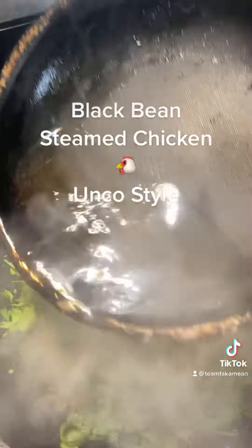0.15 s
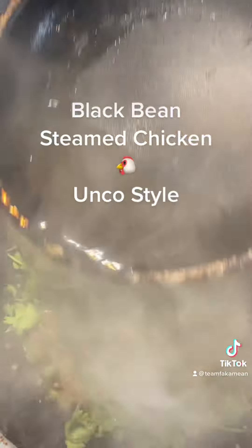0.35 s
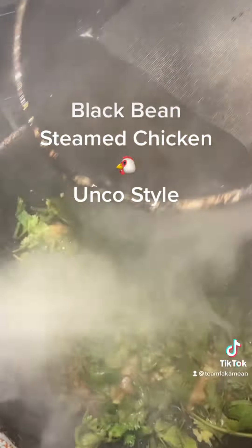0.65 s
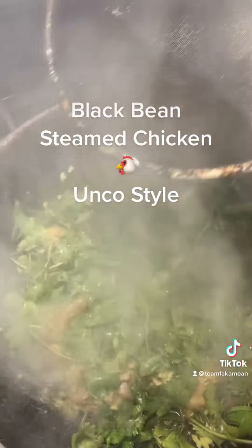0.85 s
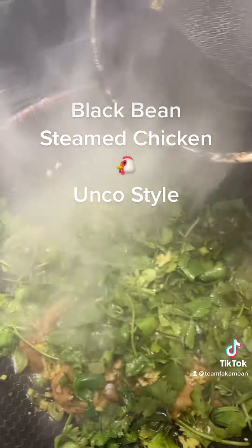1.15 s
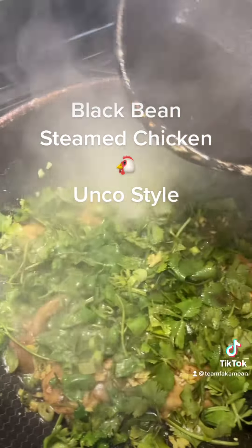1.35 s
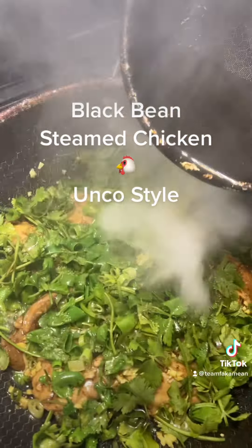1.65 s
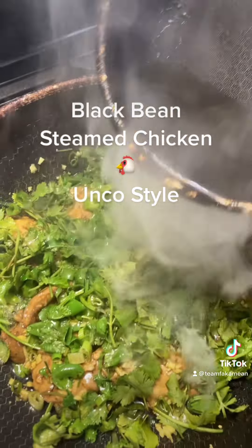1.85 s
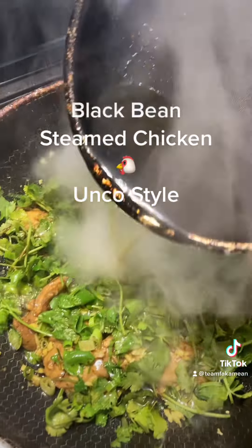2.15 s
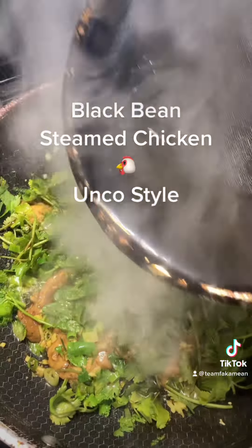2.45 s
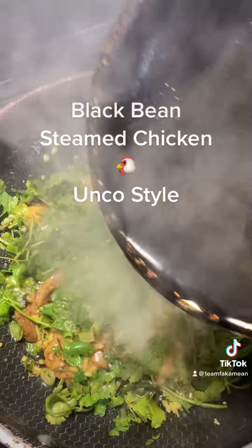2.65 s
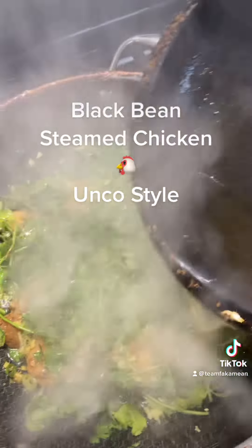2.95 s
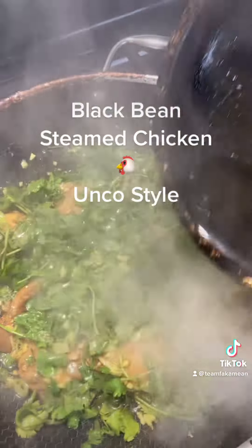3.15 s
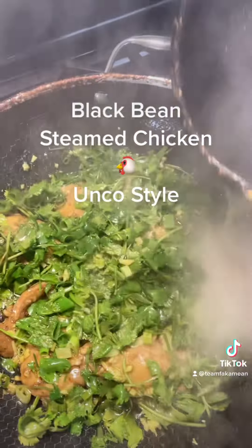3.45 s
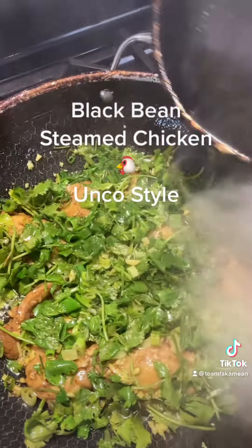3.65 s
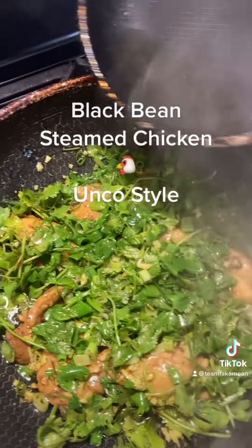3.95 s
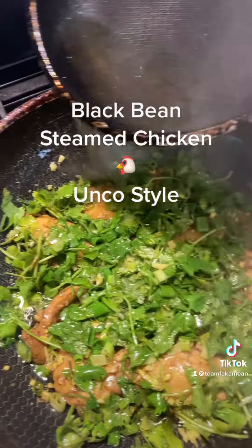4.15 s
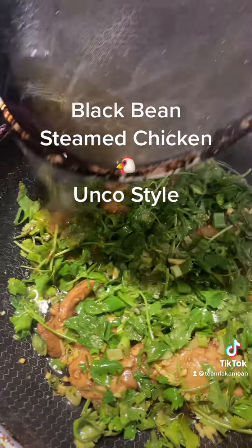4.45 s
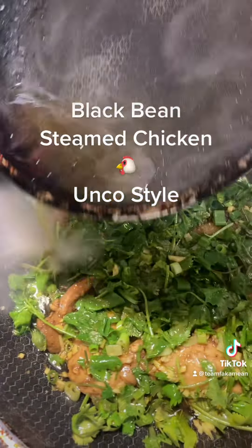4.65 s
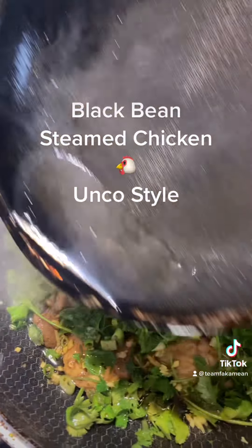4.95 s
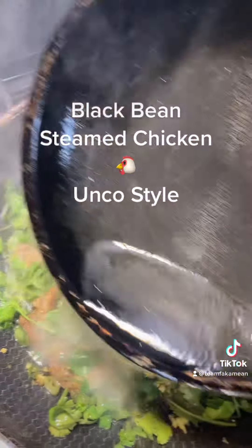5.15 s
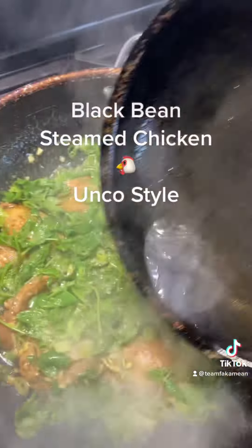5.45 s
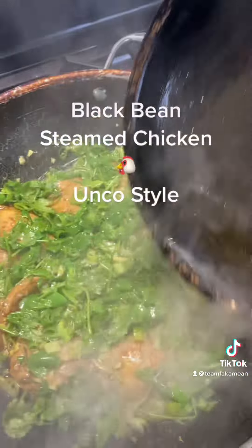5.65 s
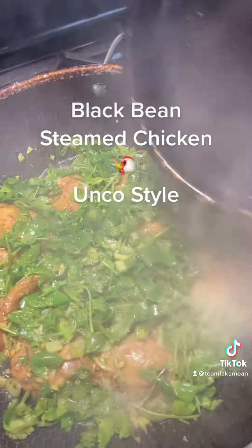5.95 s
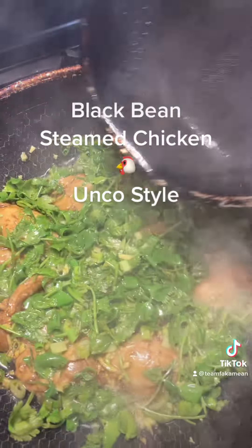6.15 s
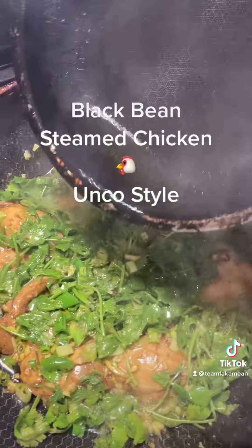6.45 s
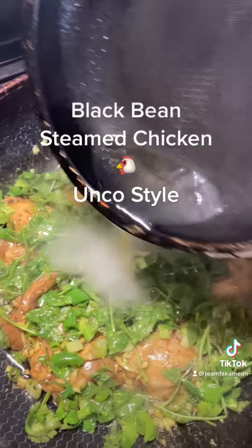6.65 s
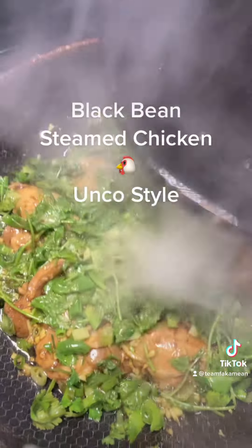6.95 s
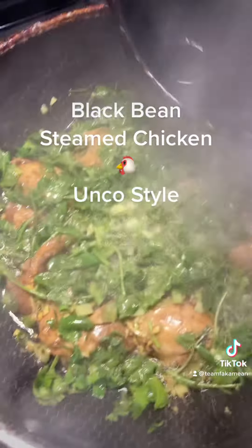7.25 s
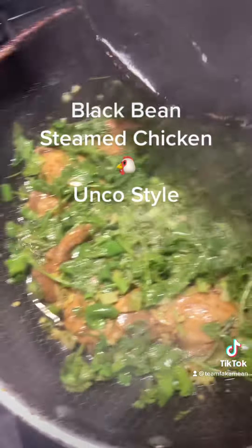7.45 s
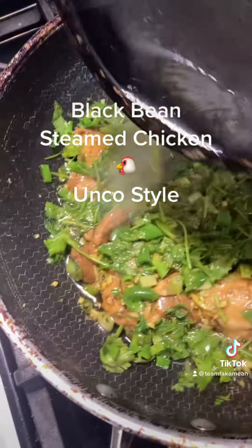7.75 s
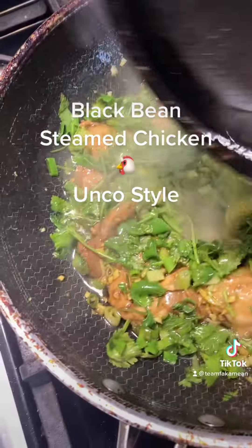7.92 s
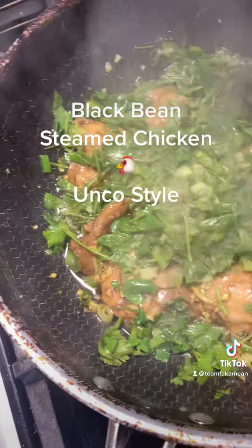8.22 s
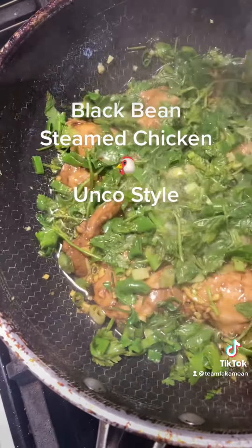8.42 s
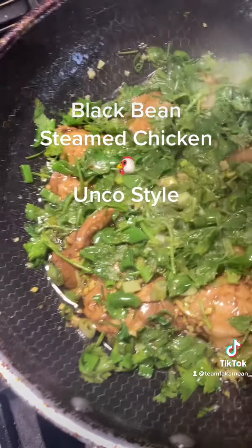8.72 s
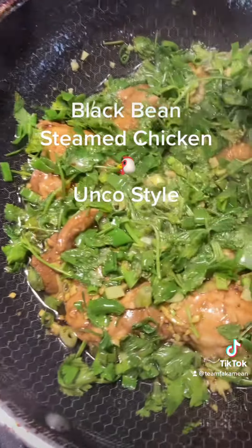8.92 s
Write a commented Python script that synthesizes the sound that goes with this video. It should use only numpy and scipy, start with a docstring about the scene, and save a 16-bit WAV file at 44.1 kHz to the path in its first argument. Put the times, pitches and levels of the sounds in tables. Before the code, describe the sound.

Hot oil sizzles loudly in repeated spurts over wet herbs in a pan, with small pops, over a low fan drone and steam rumble.

```python
"""Hot oil sizzles as it is poured in spurts over wet herbs in a wide pan, close to a phone's one microphone.
Each spurt boils up and dies away: thousands of tiny bubbles burst each second and ring the pan's hollow.
A few fat bubbles pop alone, and some splashes land with a sharp hiss. Underneath, a hood fan drones
and steam rumbles past the microphone, thicker as the oil boils harder."""
import sys
import numpy as np
from scipy import signal
from scipy.fft import rfft, irfft, next_fast_len
from scipy.io import wavfile
from scipy.ndimage import uniform_filter1d

SR = 44100
rng = np.random.default_rng(int(sys.argv[2]) if len(sys.argv) > 2 else 0)


def transcribe(signal):
    """Save signal, clipped to [-1, 1], as a 16-bit WAV file at the path in sys.argv[1]."""
    frames = np.atleast_2d(signal).T
    limited = np.clip(frames, -1, 1)
    pcm = np.round(limited * 32767).astype(np.int16)
    wavfile.write(sys.argv[1], SR, pcm)


N = 400516

# spurts of oil, each on its own patch of herbs: (start [s], rise [s], initial fade [dB/s],
# mid bubbles [dB], small bubbles [dB re mid], spray [dB re mid], large bubbles [dB re mid],
# mid tilt [dB/octave], small tilt [dB/octave], steam whistle pitch [Hz], whistle boost [dB])
SPURTS = [(-0.032, 0.22, 43, -20.5, 0.0, -1, -7, -8, -7.0, 5500, 3.0),
          (0.431, 0.05, 44.5, -14.5, 0.5, -5.0, -13, 1, -2.0, 5000.0, 1.0),
          (0.55, 0.035, 58, -26, -4, -8.5, -8, -6, -1, 4500, 2),
          (0.888, 0.06, 39.5, -21.0, 6.5, 2.5, -6.5, -5, -2.5, 5500.0, 0.5),
          (1.102, 0.015, 135.0, -25.5, -7.0, -4.0, -3, -1, -7.0, 4700.0, 2.0),
          (1.206, 0.141, 19, -20.5, 1.5, 0, -7.0, 5.0, -4.0, 5360, 7),
          (1.523, 0.078, 21, -27.0, 8.5, 0.5, -9.5, -1, 6, 4340, 4.5),
          (1.883, 0.25, 18.5, -24.5, 3.5, -3.5, -10, -6.5, -1, 4800.0, 5),
          (2.02, 0.044, 44, -32, 5, -2, -5, -3, 10, 5330, 4),
          (2.52, 0.26, 11, -27.5, 0.5, 1, -5.5, 5, 6.0, 3800.0, 3),
          (2.841, 0.27, 22, -23.5, 1.5, -4, -17, -10.0, -3, 4150, 4.0),
          (3.296, 0.14, 30.0, -26.5, 2, -0.5, -10.5, -4.0, -4, 4750.0, 1.0),
          (3.939, 0.09, 144, -32.5, -2, -6, -9.5, 9, 7, 5200.0, 3),
          (4.083, 0.047, 34, -27, 1.5, -0.5, -5.5, 2, 6, 5150.0, 1),
          (4.19, 0.4, 30, -24.5, -3, -1.5, -12, 2, -10, 4600.0, 4.5),
          (4.518, 0.18, 47, -17, -2, -6, -14.5, -10, 0, 4550.0, 6),
          (5.076, 0.022, 44, -23.5, -1.5, -2.5, -12.5, -9, -12, 5550.0, 11.0),
          (5.14, 0.21, 31, -22.5, 3, 0, -11, -8.0, 2, 4050, 7),
          (5.68, 0.14, 43, -22, 2, -2.5, -13, -3, -3.5, 4070, 2.5),
          (6.325, 0.065, 33, -30, 2.5, -0.5, -8, 6, 6.0, 4300.0, 2),
          (6.482, 0.18, 10, -26.5, 0.5, -4, -8, -2.5, 1.0, 4770, 6),
          (6.894, 0.12, 77, -23.0, -1, -1, -6.5, 7, 8, 3760, 6.5),
          (6.99, 0.17, 65, -33.5, 8.5, 4.5, 0, 3.0, 3, 5150.0, 7),
          (7.603, 0.11, 28, -28.0, 4.5, 0.5, -6, -1, 7, 5000, 5),
          (7.904, 0.15, 35, -23.0, 1.5, -1, -10, 0, -1, 5450.0, 6),
          (8.32, 0.14, 131, -43, 12, 1, -1, -5.5, 15, 5000, 3.5),
          (8.607, 0.026, 54, -35.5, 5, 0.5, -4, 15, 1, 4850.0, 4),
          (8.64, 0.15, 147, -37, 6.5, 1.5, -1.5, 1, 6.0, 4800.0, 2),
          (8.705, 0.012, 90, -42, 14, 4, 2, 0, 3, 4870, 8),
          (8.9, 0.024, 104, -49, 12.5, 6, -6, -4, 5, 5200, 3)]
# edges of the four sizzle bands, large, mid and small bubbles, then spray: (frequency [Hz])
BAND_EDGES_HZ = [450, 2000, 3400, 5900, 17000]
# what boils on between spurts, per band: (level [dB])
SIMMER_DB = [-47, -48.5, -45.5, -46.5]
# lone spits, per band: (level [dB re the dense fizz])
CRACKLE_DB = [-6.5, -6, -7, -7.5]
# how far each pitch slice swells and fades, per band: (spread [dB])
DRIFT_DB = [1.4, 2.4, 1.06, 1.9]
# EQ that pan and microphone give a burst: (frequency [Hz], gain [dB])
PAN_EQ = [(280, -59.5), (480, -33.5), (597, -13), (873, -17), (1070, -11.5), (1350, -15.5), (1920, -12),
          (2420, 4.5), (3390, -1), (4540, -0.5), (5410, 2), (6080, -9), (8140, -12.5), (12800, -12),
          (15700, -17)]
# narrow resonances of the pan's hollow: (frequency [Hz], width [Hz], boost [dB])
PAN_RESONANCES = [(2330, 200, 3), (2990, 69, 1.5), (4440, 420, 5.5), (5450, 220, 1)]
# early reflections off pan wall, lifted pan and hood: (delay [s], gain [dB])
REFLECTIONS = [(.0028, -23.5), (.0061, -18), (.011, -16)]
# slow EQ sweep as the lifted pan moves over the food; a negative dip is a boost: (time [s],
# large-bubble tilt [dB/octave], low dip [Hz], its depth [dB], upper dip depth [dB], spray tilt [dB/octave])
PAN_SWEEP = [(0.3, -2, 801, 8.5, -4.5, 1), (1.0, 1.5, 860, -7, -1.5, 0), (1.65, -1, 910, -3.5, 9, 1.5),
             (2.2, -2.5, 910, 2.5, 0, 1.5), (2.802, 0.5, 860, 5.5, 4.5, -2.5), (3.5, 0, 860, 3, -1, 2),
             (4.2, 2.5, 806, -5, 2.5, 0.5), (4.8, 0, 990, 4, -5, 1), (5.35, 2, 790, 1.5, 3, -3.5),
             (5.9, 1, 860, 0, -2, 1.5), (6.5, -4, 890, 0, 5, -0.5), (7.0, -1.5, 970, 11.5, 9, 0),
             (7.7, -1, 900, 4, 9, 1), (8.1, -1, 905, 6, -2, 1.5), (8.7, 0.5, 805, -1, 4.5, -4)]
# air noise of the hood fan: (frequency [Hz], gain [dB])
FAN_EQ = [(35, -30), (60, -5), (399, -5.5), (548, -11.5), (821, -13), (1900, -11), (2470, -39),
          (4180, -120)]
# hum of the fan: (pitch [Hz], level [dB])
FAN_TONES = [(124, -68.5), (415, -65.5)]
# steam rumble: (frequency [Hz], gain [dB])
STEAM_EQ = [(15, -43), (25, -17), (118, -2.5), (152, -4.5), (206, -0.5), (476, -5), (520, -0.5),
            (680, -7.5), (1140, -120)]
# thick clouds of steam that hit the microphone: (time [s], half-width [s], boost [dB])
STEAM_CLOUDS = [(.18, 0.23, 8), (.58, 0.17, 4.5), (4.65, 0.18, 0.5), (8.88, 0.09, 4)]
# slow fader ride on fan and steam together: (time [s], gain [dB])
BED_RIDE = [(0, -0.5), (2.8, 2), (3.9, -3), (4.8, 1), (6.1, 0), (7.2, 1.5), (9.08, 0.5)]
# fat bubbles that pop alone: (time [s], level [dB], pitch [Hz])
POPS = [(0.255, -2, 2430), (0.5394, -9, 2490), (1.724, 7, 4600), (2.4289, -12, 2540), (3.1692, -15, 4580),
        (3.916, -14, 2430), (4.436, -4, 2440), (4.4473, 1, 4100), (5.232, 4, 4460), (5.4745, -4, 2330),
        (5.4999, -1, 5100), (5.7009, -16, 4000), (6.205, -7.5, 2640), (6.2608, -12, 2630),
        (6.548, -7, 2510), (7.2659, -7, 5370), (7.3355, -14, 5130), (7.368, -9, 5590), (8.2881, -15, 2760),
        (8.4287, -6, 4900), (8.556, -4.5, 4600), (8.7154, -3, 5010), (8.7184, -7, 4600), (8.78, -7, 4700),
        (8.9743, -9.5, 4360), (9.0727, -18.5, 4470)]
# first hiss as a splash of oil lands: (time [s], level [dB])
SPLASHES = [(0.4484, -9), (0.9054, -4), (4.0916, -21), (5.0914, 2), (5.7228, -13), (6.345, -4),
            (7.6206, -19), (8.6268, -10)]


def undb(db):
    """Decibels to amplitude."""
    return 10 ** (np.asarray(db) / 20)


def level(x, db):
    """Set the rms level."""
    return x * undb(db) / np.sqrt(np.mean(x ** 2))


def decay(age, t60):
    """Envelope that falls 60 dB in t60 seconds."""
    return np.exp(-np.log(1000) * age / t60)


def bell(hz, centre_hz, width_hz):
    """EQ bell: 1 at the centre, 1/2 at the edges of the width."""
    return 1 / (1 + (2 * (hz - centre_hz) / width_hz) ** 2)


def walk(rate):
    """Random levels held 1 / rate s and slewed twice; spread near 1."""
    hold = int(SR / rate)
    steps = np.repeat(rng.standard_normal(N // hold + 1), hold)
    return 1.2 * uniform_filter1d(uniform_filter1d(steps, hold), hold)[:N]


def eq(x, points, peaks=(), size=4096):
    """Minimum-phase EQ through (frequency [Hz], gain [dB]) points, with resonant bells on top."""
    hz, db = np.transpose(points)
    bins_hz = np.arange(size // 2 + 1) * SR / size
    gain_db = np.interp(np.log(bins_hz + 1), np.log(hz), db)
    gain_db += sum(boost * bell(bins_hz, centre, width) for centre, width, boost in peaks)
    cepstrum = irfft(np.log(undb(gain_db)))
    cepstrum[1:size // 2] *= 2  # folded, so the ring follows the hit
    cepstrum[size // 2 + 1:] = 0
    return signal.fftconvolve(x, irfft(np.exp(rfft(cepstrum))))[:N]


def slices(x, lo_hz, hi_hz, count):
    """Split a band into overlapping pitch slices; yields (centre [Hz], sound)."""
    size = next_fast_len(N)
    spectrum, octave = rfft(x, size), np.log2(np.arange(1, size // 2 + 2) * SR / size)
    step = np.log2(hi_hz / lo_hz) / count
    for k in range(count):
        centre = np.log2(lo_hz) + (k + .5) * step
        mask = np.cos(np.pi / 2 * np.clip((octave - centre) / step, -1, 1)) ** 2
        yield 2 ** centre, irfft(spectrum * mask, size)[:N]


def reflect(x, sway=0.043):
    """Short reflections from metal close by; hand and pans move, so the paths sway."""
    n = np.arange(N)
    return x + sum(undb(db) * np.interp(n - delay * SR * (1 + sway * walk(1.5)), n, x, left=0)
                   for delay, db in REFLECTIONS)


def boil(drying_db_s2=4.5):
    """Spurts swell, then fade ever faster as they dry; gives four band levels, two tilts, the whistle."""
    start, rise, fade, mid_db, small_db, spray_db, large_db, *tone = np.transpose(SPURTS)[:, :, None]
    ticks = np.arange(0, N, 32)
    age = ticks / SR - start
    fading = np.maximum(age - rise, 0)
    attack = np.sin(np.pi / 2 * np.clip(age / rise, 0, 1))
    envelope = attack * undb(mid_db - fade * fading - drying_db_s2 * fading ** 2)
    powers = [(envelope * undb(db)) ** 2 for db in (large_db, 0, small_db, spray_db)]
    levels = [10 * np.log10(power.sum(0) + undb(2 * db)) for power, db in zip(powers, SIMMER_DB)]
    # the loudest patch dominates the tone
    mid, small = powers[1] ** 2, powers[2] ** 2
    blended = [(weight * column).sum(0) / (weight.sum(0) + 1e-30)
               for weight, column in zip((mid, small, small, small), tone)]
    return [np.interp(np.arange(N), ticks, curve) for curve in levels + blended]


def bursts(rate, spread_db):
    """Bursting bubbles click at random, rate times a second; most are soft, a few are loud."""
    chance, size, sign = rng.random(N), rng.exponential(size=N), rng.choice([-1, 1], N)
    return level((chance < rate / SR) * sign * undb(spread_db * np.minimum(size, 4)), 0)


def spits(rate, spread_db, t60):
    """Tiny jets of steam: a sudden start and a noisy tail a few ms long."""
    envelope = signal.lfilter([1], [1, -decay(1 / SR, t60)], np.abs(bursts(rate, spread_db)))
    return level(envelope * rng.standard_normal(N), 0)


def sizzle(sputter_db=0.6, flicker_db=0.45, upper_dip_hz=1390, dip_width_hz=150, whistle_width_hz=320):
    """Water boils in the oil: a dense fizz per band and a shared crackle ring the pan."""
    *levels, mid_tilt, small_tilt, whistle_hz, whistle_db = boil()
    times, *columns = np.transpose(PAN_SWEEP)
    sweep = (np.interp(np.arange(N) / SR, times, column) for column in columns)
    large_tilt, dip_hz, dip_db, upper_dip_db, spray_tilt = sweep
    band_eq_db = (
        lambda hz: (large_tilt * np.log2(hz / 1000) - dip_db * bell(hz, dip_hz, dip_width_hz)
                    - upper_dip_db * bell(hz, upper_dip_hz, dip_width_hz)),
        lambda hz: mid_tilt * np.log2(hz / 2600),
        lambda hz: small_tilt * np.log2(hz / 4540) + whistle_db * bell(hz, whistle_hz, whistle_width_hz),
        lambda hz: spray_tilt * np.log2(hz / 10000))
    crackle = spits(rate=200, spread_db=3.3, t60=.012)
    sputter = sputter_db * walk(40)  # moves all bands together
    mix = 0
    for k, db in enumerate(levels):
        fizz = bursts(rate=12000, spread_db=1.1)
        rung = eq(reflect(fizz + undb(CRACKLE_DB[k]) * crackle), PAN_EQ, PAN_RESONANCES)
        # boiling spots wander over the pan, so neighbouring pitches swell and fade on their own
        spots = sum(undb(band_eq_db[k](hz) + DRIFT_DB[k] * walk(6)) * part
                    for hz, part in slices(rung, *BAND_EDGES_HZ[k:k + 2], count=12))
        mix += level(spots, 0) * undb(db + sputter + flicker_db * walk(25))
    return mix


def hood_fan(air_db=-56, waver_db=3.0):
    """The fan pushes a steady rush of air and hums on two wavering tones."""
    t = np.arange(N) / SR
    hum = sum(undb(db + 3.5 + waver_db * walk(3.7)) * np.sin(2 * np.pi * hz * t + 1.65 * walk(8))
              for hz, db in FAN_TONES)
    return level(eq(rng.standard_normal(N), FAN_EQ), air_db) + hum


def steam_rumble(offset_db=-32.5, follow_db_per_db=0.64, smooth_s=0.079):
    """Steam rolls past the microphone, thicker as the oil boils harder."""
    t = np.arange(N) / SR
    spray_db = boil()[3]
    steam_db = offset_db + follow_db_per_db * uniform_filter1d(spray_db, int(smooth_s * SR))
    clouds_db = sum(db * np.exp(-((t - time) / width) ** 2) for time, width, db in STEAM_CLOUDS)
    return level(eq(rng.standard_normal(N), STEAM_EQ), 0) * undb(steam_db + clouds_db)


def pops(ring_db=-5, ring_t60=.004, crack_db=-9, crack_t60=0.0087):
    """A fat bubble rings briefly at its own pitch over a broad, dry crack."""
    ring, crack = np.zeros(N), np.zeros(N)
    t = np.arange(SR // 50) / SR
    for time, db, hz in POPS:
        i = int(time * SR)
        ping = np.sin(2 * np.pi * hz * t) * decay(t, ring_t60)
        snap = rng.standard_normal(len(t)) * decay(t, crack_t60)
        ring[i:i + len(t)] -= undb(db + ring_db) * ping[:N - i]
        crack[i:i + len(t)] += undb(db + crack_db) * snap[:N - i]
    bandpass = signal.butter(3, [660, 9400], "band", fs=SR, output="sos")
    return reflect(signal.sosfilt(bandpass, ring) + eq(crack, PAN_EQ, PAN_RESONANCES))


def splashes(rise_s=0.0041, t60=0.061, hiss_db=-15):
    """Oil lands with a sudden fizz that dies into the boil."""
    envelope = 0
    for time, db in SPLASHES:
        age = np.maximum(np.arange(N) / SR - time, 0)
        envelope += undb(db) * (1 - np.exp(-age / rise_s)) * decay(age, t60)
    hiss = eq(bursts(rate=9000, spread_db=1.4), PAN_EQ, PAN_RESONANCES)
    return envelope * level(hiss, hiss_db)


def scene():
    """Frying up front over a low bed of fan and steam, the same in both channels."""
    frying = sizzle() + pops() + splashes()
    ride = undb(np.interp(np.arange(N) / SR, *np.transpose(BED_RIDE)))
    bed = ride * (hood_fan() + steam_rumble())
    return np.tile(frying + bed, (2, 1))


def record(dry):
    """The phone soft-clips the loudest peaks and cuts the top."""
    ceiling, top_hz = .7, 15750
    rounded = dry / (1 + (dry / ceiling) ** 4) ** .25
    return signal.sosfilt(signal.ellip(12, .2, 80, top_hz, fs=SR, output="sos"), rounded)


dry = scene()
out = record(dry)
transcribe(out)
```